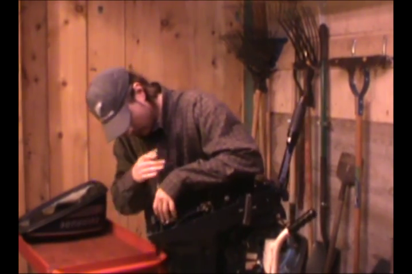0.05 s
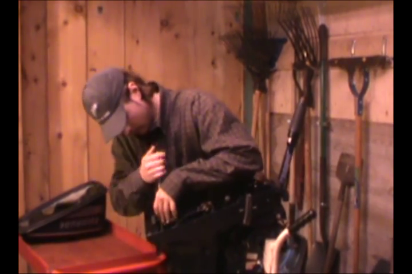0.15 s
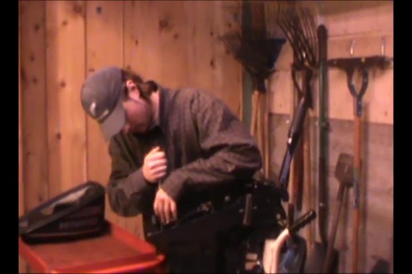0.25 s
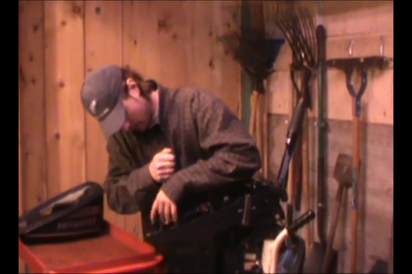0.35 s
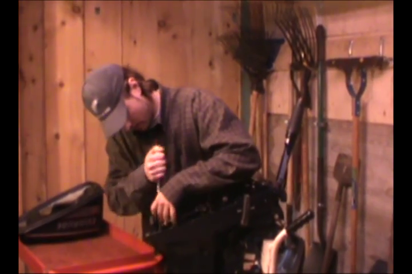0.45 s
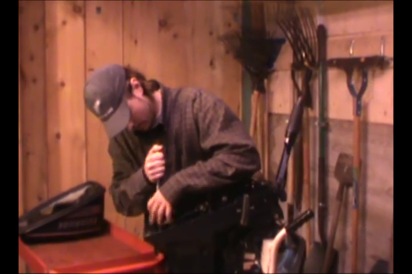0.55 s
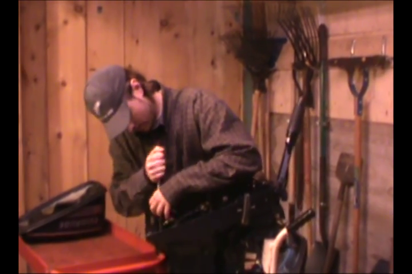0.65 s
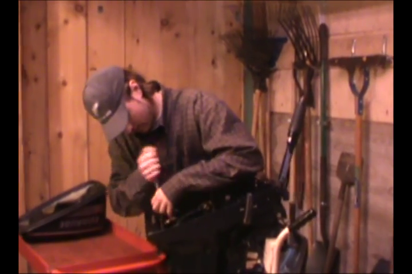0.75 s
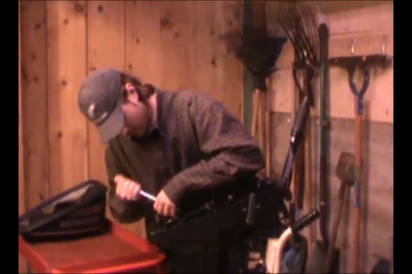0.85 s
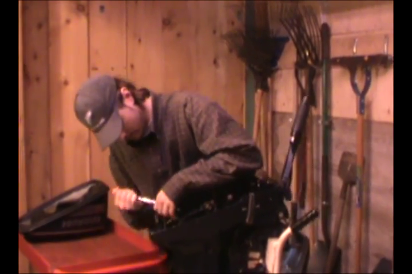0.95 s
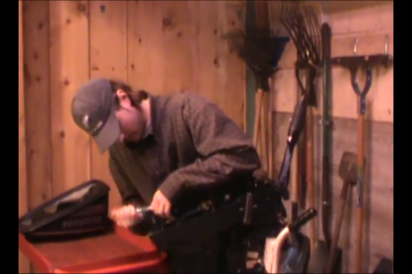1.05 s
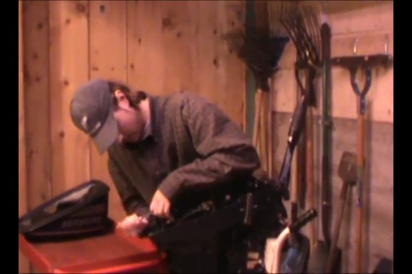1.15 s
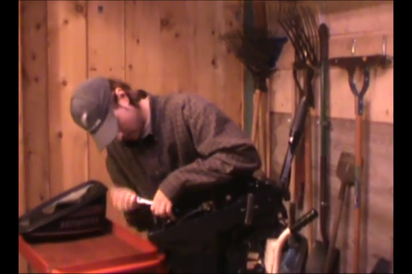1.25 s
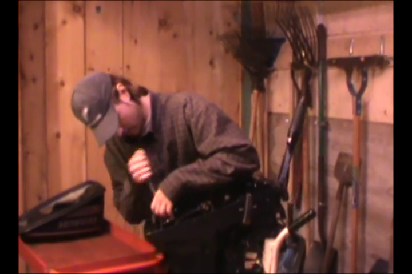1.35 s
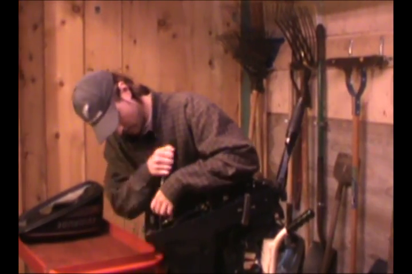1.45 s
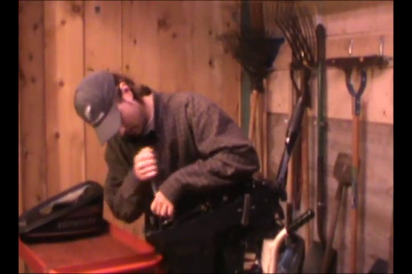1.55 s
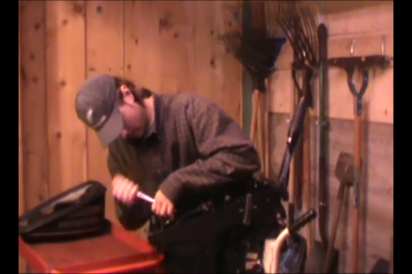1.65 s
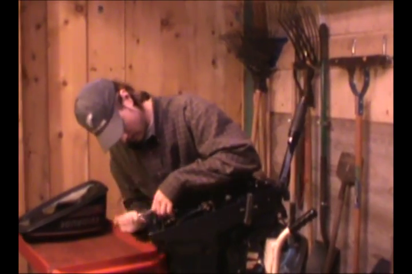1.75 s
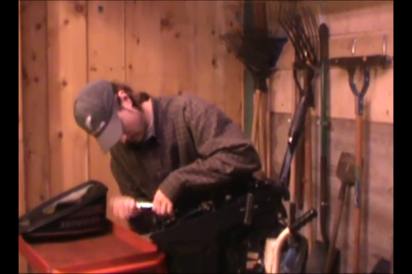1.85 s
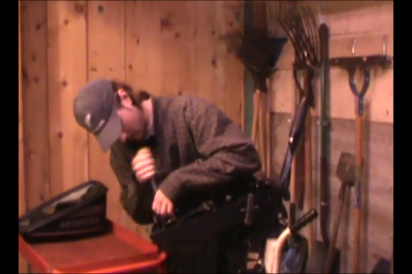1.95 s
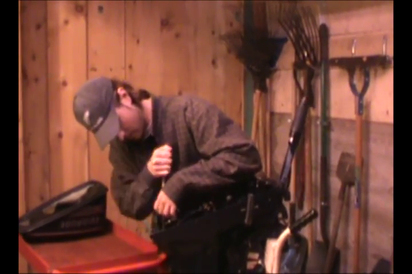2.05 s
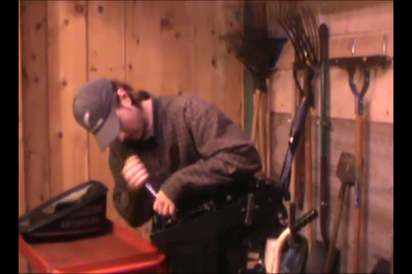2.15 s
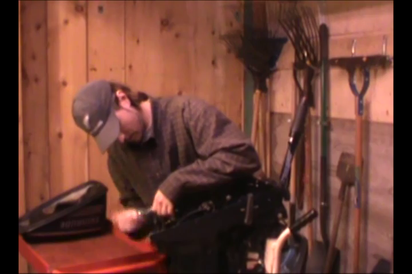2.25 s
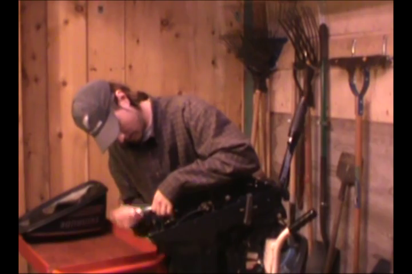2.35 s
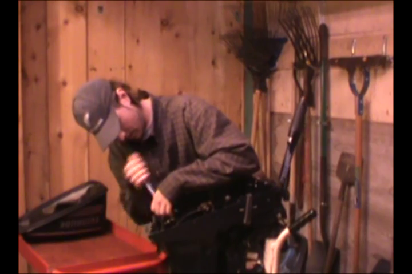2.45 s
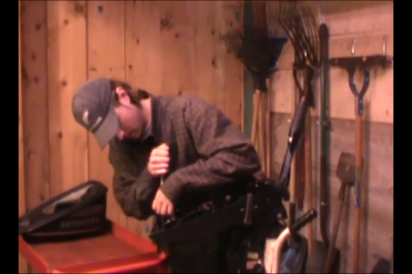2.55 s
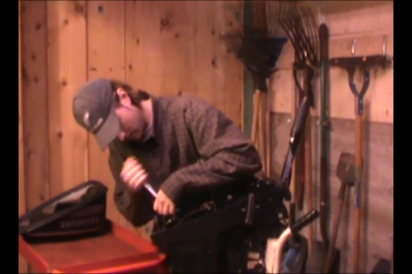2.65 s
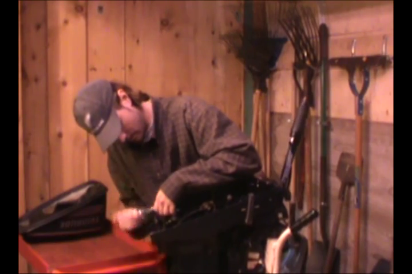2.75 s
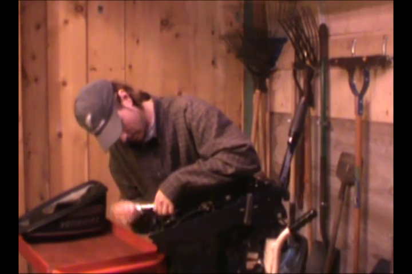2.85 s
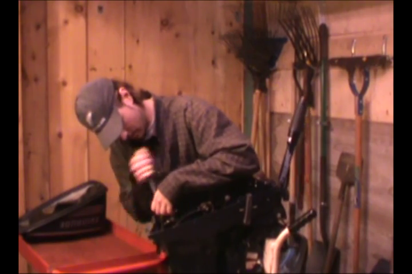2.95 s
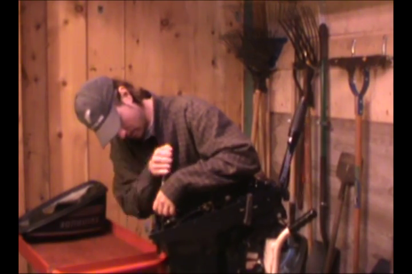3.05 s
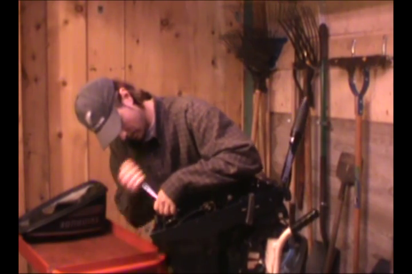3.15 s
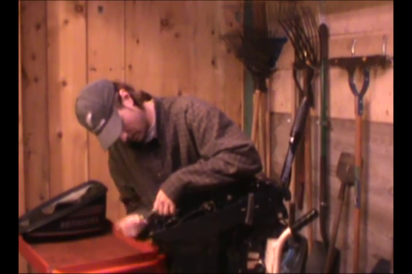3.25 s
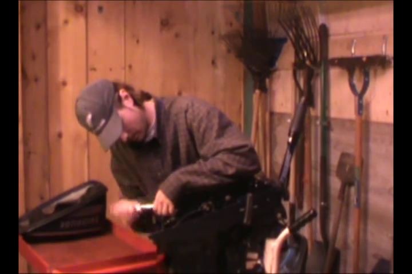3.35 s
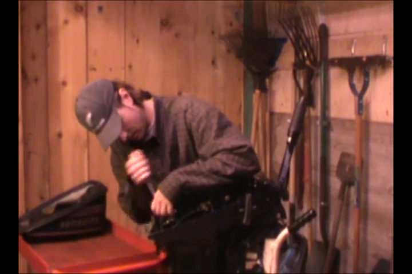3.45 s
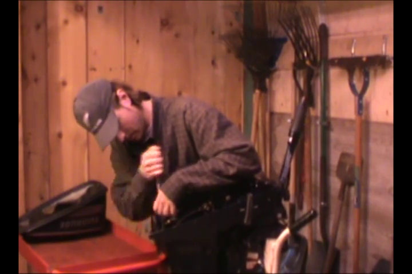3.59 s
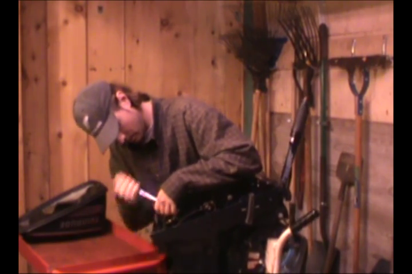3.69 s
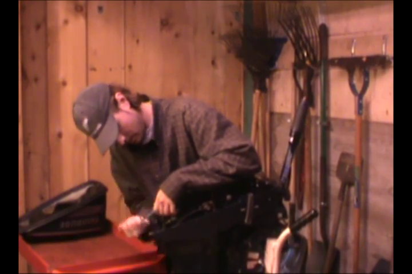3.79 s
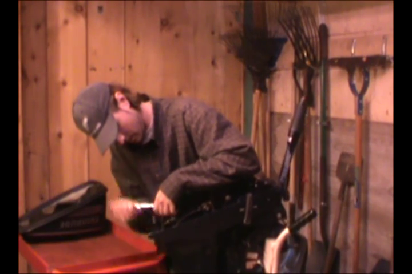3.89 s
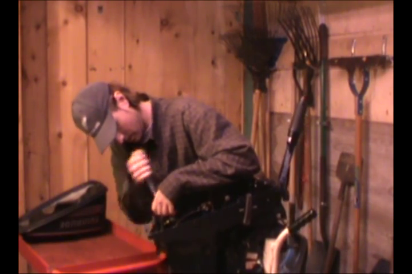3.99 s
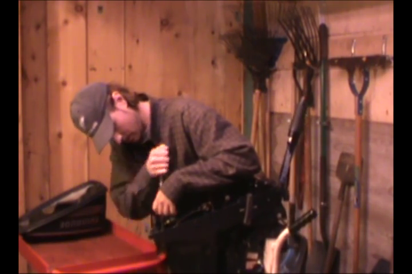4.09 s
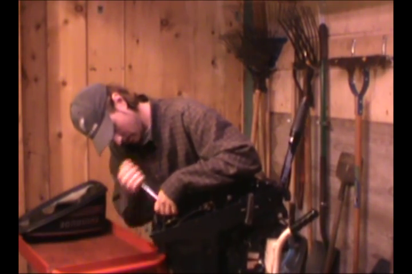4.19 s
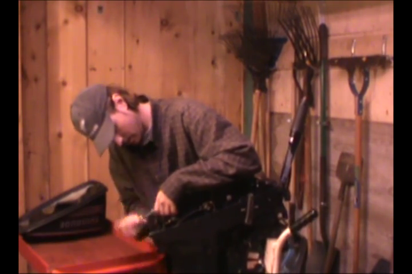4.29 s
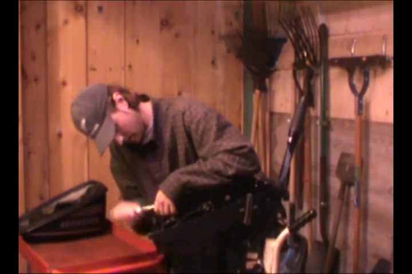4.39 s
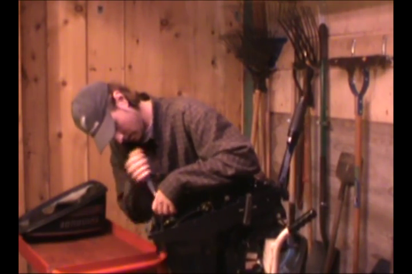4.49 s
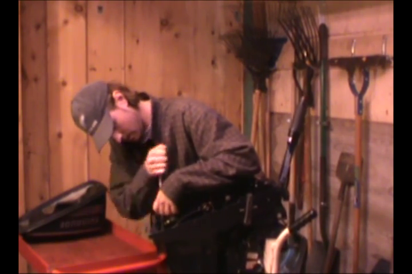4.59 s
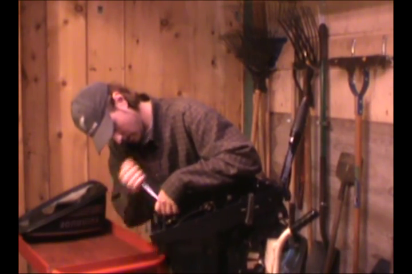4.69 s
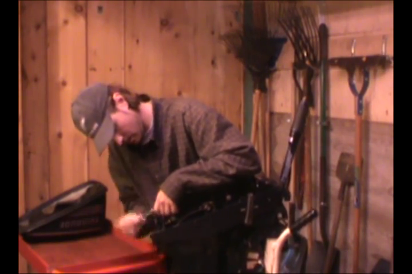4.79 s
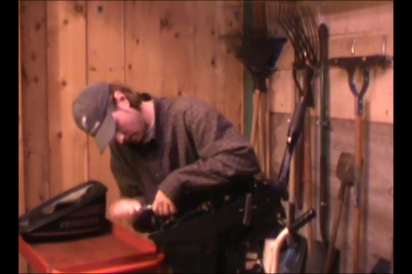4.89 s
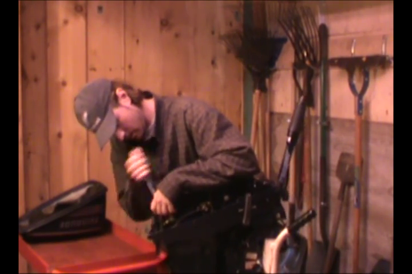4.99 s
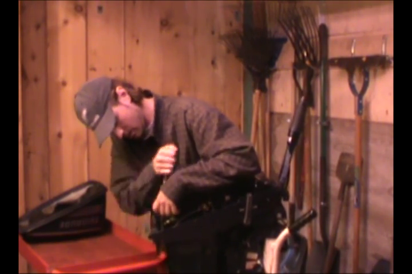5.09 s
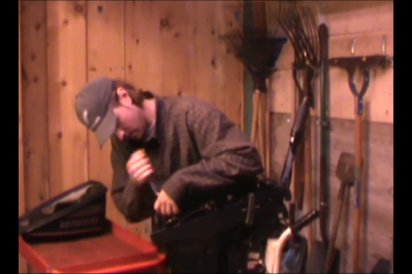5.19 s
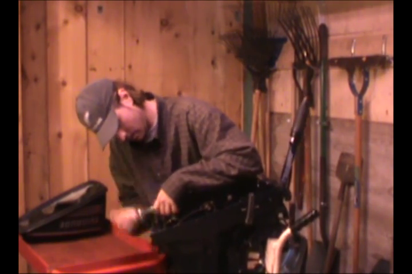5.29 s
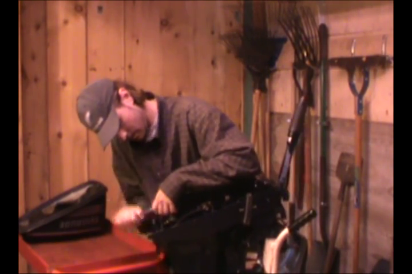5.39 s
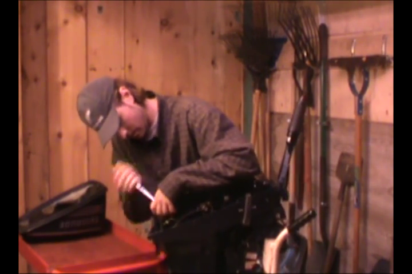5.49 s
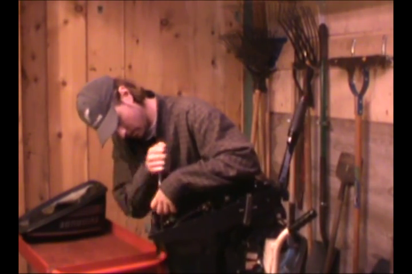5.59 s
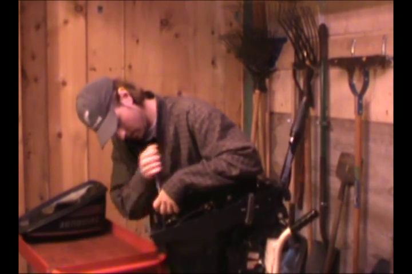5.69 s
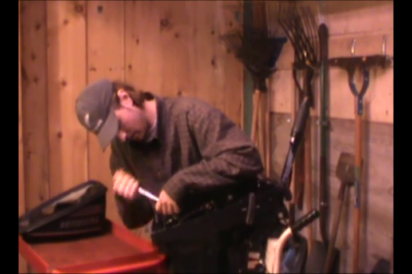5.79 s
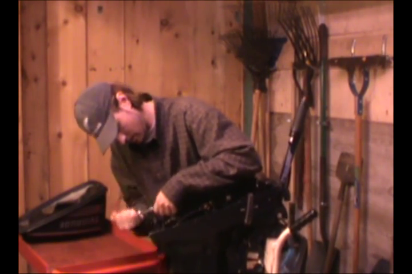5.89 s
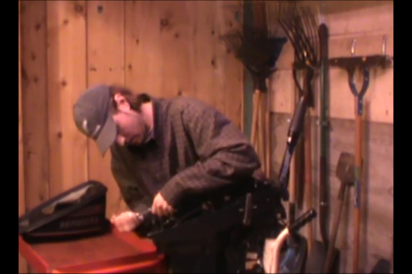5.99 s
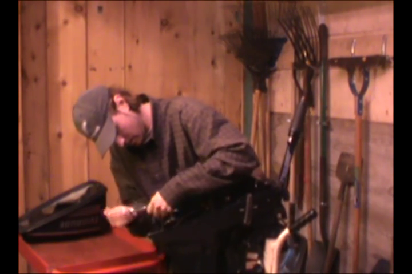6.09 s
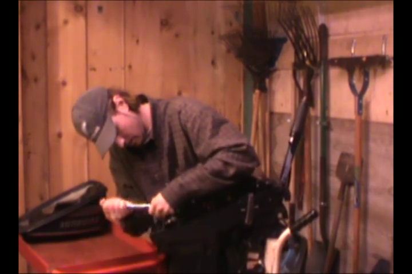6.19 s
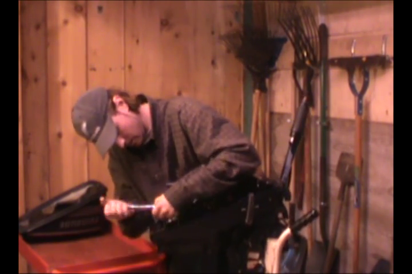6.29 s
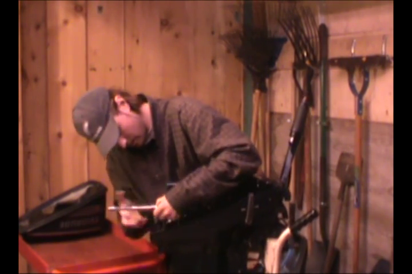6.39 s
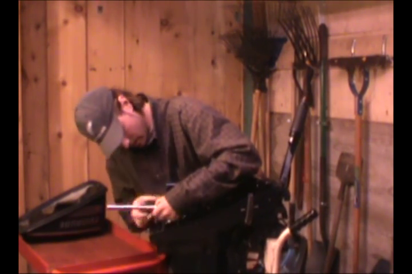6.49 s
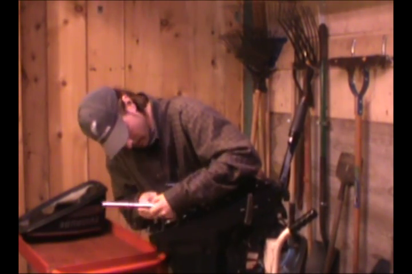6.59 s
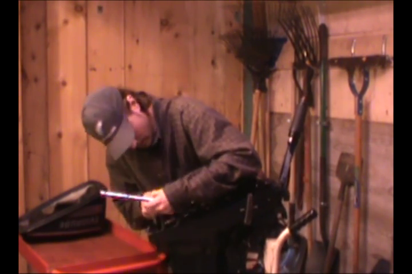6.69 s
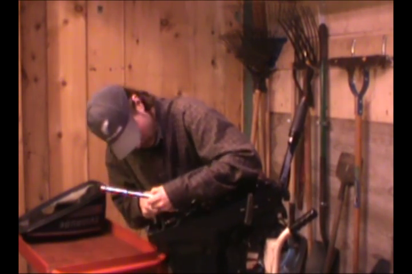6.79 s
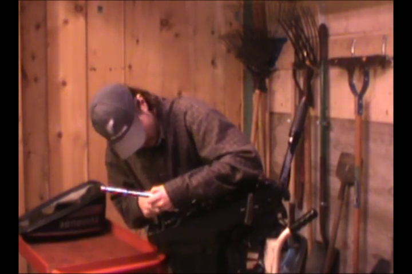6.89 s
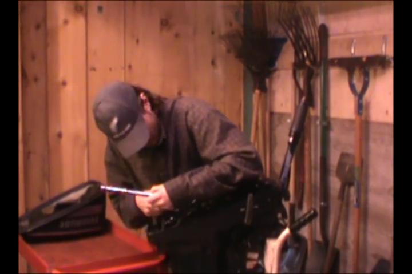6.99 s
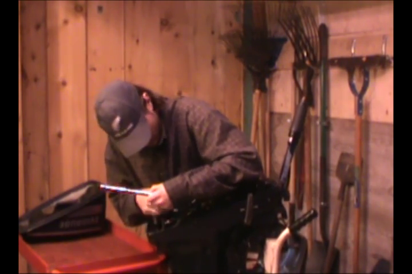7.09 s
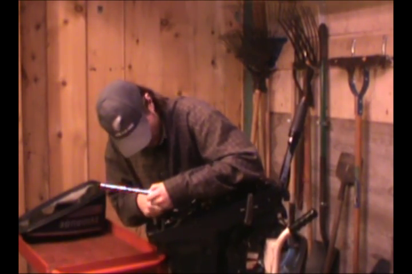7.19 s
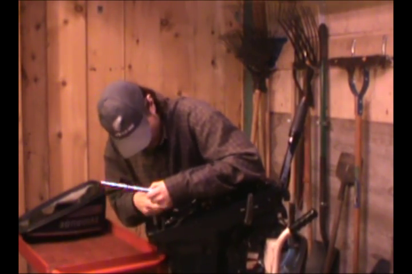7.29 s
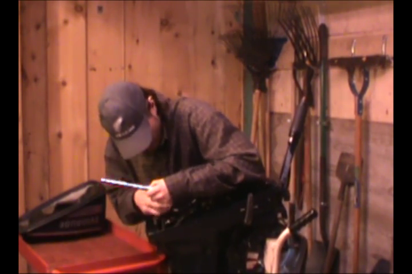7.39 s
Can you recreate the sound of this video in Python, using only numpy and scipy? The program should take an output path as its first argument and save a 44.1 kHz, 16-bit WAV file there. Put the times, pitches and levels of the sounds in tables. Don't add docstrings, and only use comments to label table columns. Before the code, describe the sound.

Short rapid bursts of crisp ratchet clicking repeat steadily, mixed with steel taps and hollow knocks, in a small echoing wooden shed.

```python
import sys
import numpy as np
from scipy import signal
from scipy.fft import rfft, irfft, next_fast_len
from scipy.io import wavfile

SR = 44100
rng = np.random.default_rng(int(sys.argv[2]) if len(sys.argv) > 2 else 0)


def bounce(signal):
    frames = np.transpose(np.atleast_2d(signal))
    limited = np.clip(frames, -1, 1)
    pcm = np.round(limited * 32767).astype(np.int16)
    wavfile.write(sys.argv[1], SR, pcm)


def gain_from_db(level_db):
    decades = np.asarray(level_db, float) / 20
    return 10 ** decades


N = 328103


def curve(points, hz):
    f, v = np.transpose(points)
    return np.interp(np.log(np.maximum(hz, 1)), np.log(f), v)


def colour(x, points):
    n = next_fast_len(x.shape[-1])
    gain = gain_from_db(curve(points, np.fft.rfftfreq(n, 1 / SR)))
    return irfft(rfft(x, n) * gain, n)[..., :x.shape[-1]]


def unit(x):
    return x / np.sqrt(np.mean(x ** 2))


def band(x, hz, width, order=3):
    edges = np.clip([hz * 2 ** (-width / 2), hz * 2 ** (width / 2)], 20, .45 * SR)
    return signal.sosfilt(signal.butter(order, edges, "band", fs=SR, output="sos"), x)


def ring(x, hz, t60):
    r, c = np.exp(-np.log(1000) / t60 / SR), np.cos(2 * np.pi * hz / SR)
    return signal.lfilter([1, -r * c], [1, -2 * r * c, r * r], x)


def burst(t60, size):
    return rng.standard_normal(size) * np.exp(-np.log(1000) * np.arange(size) / SR / max(t60, .001))


def add(out, s, x):
    i = int(s * SR)
    out[i:i + len(x)] += x[:len(out) - i]


def air(rumble_db):
    # f/Hz, level/dB per Hz
    hiss_colour = [(82, -13), (140, -6), (167, -10), (619, -8.5), (684, -30), (740, -7), (1100, -13),
                   (1450, -16.5), (16000, -22.5)]
    # f/Hz, side minus mid/dB
    hiss_width = [(60, -26), (110, -16.5), (200, -9), (380, -4), (700, -4.5), (1290, 1), (2380, 0),
                  (4400, -5.5), (8120, -11.5), (15000, -19)]
    # f/Hz, level/dB per Hz
    rumble_colour = [(12, -51), (20, -10), (27, -11.5), (43, -7), (65, 9.5), (81, 8), (102, -1), (160, -7),
                     (210, -23), (350, -120)]
    mid, side, low, side_low = rng.standard_normal((4, N))
    mid, side = colour(np.array([mid, colour(side, hiss_width)]), hiss_colour)
    hiss = gain_from_db(-56) * np.array([mid + side, mid - side]) / np.std(mid)
    rumble = colour(low + .055 * side_low * np.array([[1], [-1]]), rumble_colour)
    return hiss + gain_from_db(rumble_db) * unit(rumble)


def casing(push):
    # f/Hz, level/dB, t60/s
    cover_modes = [(338, 4, 0.033), (539.6, 7.5, 0.054), (658, 7, 0.04), (901, -36.5, 0.0057),
                   (1445, 2, 0.027), (1730, -8, 0.01)]
    return sum(gain_from_db(db) * ring(push, hz, t60) for hz, db, t60 in cover_modes)


def stir(cover_db, cloth_db):
    strength_db = rng.exponential(size=(2, N // 200 + 1)).repeat(200, axis=1)[:, :N]
    pushes, rustle = rng.standard_normal((2, N)) * gain_from_db(1.16 * strength_db)
    cover = unit(unit(casing(pushes)) + unit(band(pushes, 604, width=3.7)))
    return gain_from_db(cover_db) * cover + gain_from_db(cloth_db) * unit(band(rustle, 7160, width=0.79))


def knocks():
    # t/s, peak/dB, centre f/Hz
    bumps = [(0.196, -42, 663), (0.521, -36.5, 517), (0.817, -36, 450), (0.839, -42, 443), (1.58, -50, 558),
             (1.63, -46, 715), (1.729, -47.5, 527), (1.925, -47, 650), (2.176, -41, 1100),
             (2.36, -47.5, 620), (2.425, -40, 690), (2.645, -42.5, 650), (2.87, -46, 700),
             (3.165, -45.5, 640), (3.33, -40, 840), (4.216, -42, 620), (4.32, -41, 640),
             (4.845, -42.5, 800), (5.3, -43.5, 700), (6.245, -45.5, 695), (6.617, -46.5, 600),
             (7.06, -54, 630)]
    # t/s, peak/dB, centre f/Hz, t60/s
    clacks = [(0.521, -31.5, 2480, 0.044), (0.808, -43, 5000, .04), (0.817, -24.5, 2450, 0.03),
              (0.91, -39, 4500, 0.013), (3.689, -35, 2840, 0.095), (3.853, -32.5, 3300, 0.077),
              (6.218, -40, 4500, 0.054), (0.838, -27, 1520, 0.018), (0.924, -34.5, 2400, 0.096),
              (1.672, -40, 4500, 0.015), (2.359, -37.5, 1230, 0.15), (2.42, -29.5, 3020, 0.081),
              (2.645, -31, 4480, 0.12), (2.682, -36, 4000, 0.057), (2.9, -39.5, 1460, 0.077),
              (3.237, -33, 4900, 0.013), (3.27, -52, 2480, 0.052), (3.348, -32, 1470, 0.021),
              (4.378, -32, 2270, 0.021), (4.439, -39, 3500, 0.048), (4.7, -29, 3920, 0.024),
              (4.879, -28.5, 3180, 0.028), (4.944, -31.5, 3500, 0.0077), (5.244, -24.5, 3900, 0.018),
              (5.357, -32.5, 1690, 0.074), (5.41, -35.5, 1690, 0.035), (5.845, -43, 1940, 0.022),
              (6.161, -28, 5260, 0.11), (6.18, -41, 5500, 0.097), (6.199, -37, 5000, 0.087),
              (6.265, -46, 5170, 0.071), (6.241, -37, 4800, 0.053), (6.31, -36, 3500, 0.031),
              (6.327, -31, 4900, 0.031), (6.345, -47, 3500, .03), (6.362, -49, 3200, .03),
              (6.616, -36, 4270, 0.023), (6.618, -44.5, 1850, 0.034), (7.06, -56, 1510, 0.04),
              (6.17, -42.5, 1400, 0.15), (6.329, -40, 1490, 0.037)]
    # t/s, peak/dB, centre f/Hz, t60/s
    taps = [(0.02, -40, 8000, 0.011), (0.097, -54, 8000, .012), (0.112, -45, 4120, 0.027),
            (0.113, -44, 8500, 0.022), (0.3997, -15, 8080, 0.015), (0.4, -30.5, 3430, 0.017),
            (0.402, -38.5, 3860, 0.072), (0.401, -22.5, 9730, 0.049), (0.555, -39.5, 8300, 0.029),
            (0.834, -38, 7800, 0.027), (0.924, -40, 1930, 0.035), (0.923, -42, 3380, 0.021),
            (0.936, -38, 3120, 0.026), (0.817, -26.5, 7300, 0.015), (0.83, -34, 3780, 0.049),
            (6.242, -25.5, 5330, 0.013), (6.166, -37, 7000, 0.0064), (6.173, -33, 7500, .005),
            (6.244, -38, 8500, .012), (6.33, -51, 8450, .012), (3.345, -52, 1570, 0.052),
            (0.4, -29, 15600, 0.043), (0.896, -39, 8050, 0.022), (1.042, -42, 7450, 0.016),
            (3.833, -37, 7500, .015), (3.848, -33, 8000, 0.025), (1.893, -48, 4070, 0.066),
            (2.357, -44, 7460, .02), (2.918, -41, 4020, .03), (2.918, -40, 7200, 0.034),
            (3.212, -37.5, 4200, 0.034), (4.377, -34, 7850, 0.036), (5.357, -43, 6540, .04),
            (6.138, -35.5, 4030, 0.035), (6.139, -34, 8550, 0.02), (6.241, -32, 8500, 0.026),
            (6.328, -45, 8560, .035), (6.36, -40, 4000, .015)]
    bump_t60_s, bump_octaves, clack_octaves = 0.075, 1.84, 1.85
    tap_octave_s = 0.0079
    rows = [(*row, bump_t60_s, bump_octaves) for row in bumps]
    rows += [(*row, clack_octaves) for row in clacks]
    rows += [(*row, tap_octave_s / row[3]) for row in taps]
    rise = np.minimum(np.arange(5000) / SR / 0.00045, 1)
    out = np.zeros(N)
    for s, db, hz, t60, width in rows:
        knock = band(rise * burst(t60, size=5000), hz, np.clip(width, .03, 3.5), order=2)
        add(out, s, gain_from_db(db) * knock / np.abs(knock).max())
    return out + gain_from_db(-40.5) * casing(out)


def soft_tones(table, rise_s):
    out, t = np.zeros(N), np.arange(6000) / SR
    for s, db, hz, t60 in table:
        fade = gain_from_db(db - 60 * t / t60) * (1 - np.exp(-t / rise_s))
        add(out, s, fade * np.sin(2 * np.pi * hz * t))
    return out


def cover_rings():
    # t/s, level/dB, f/Hz, t60/s
    notes_of_cover = [(.524, -47, 694, 0.057), (1.3, -40.5, 673, 0.1), (1.562, -46, 550, 0.093),
                      (1.61, -49, 694, .07), (1.756, -49, 519, 0.17), (2.177, -45, 675, 0.052),
                      (2.426, -42.5, 702, 0.15), (2.481, -38, 667, 0.054), (2.646, -37, 530, 0.039),
                      (2.933, -43, 700, 0.054), (3.005, -47, 706, 0.074), (3.164, -47, 514, .06),
                      (3.29, -37.5, 670, 0.036), (3.33, -47, 530, 0.055), (3.423, -40, 673, 0.096),
                      (3.832, -44.5, 509, 0.067), (4.084, -42, 560, .05), (4.217, -41, 501, 0.12),
                      (4.464, -38, 651, .06), (4.586, -38, 665, 0.076), (4.849, -40.5, 705, 0.057),
                      (4.885, -43, 520, 0.057), (5.051, -51, 690, 0.052), (5.092, -41, 658, 0.076),
                      (5.248, -45, 506, 0.077), (5.362, -41, 630, 0.053), (5.51, -52, 682, 0.092),
                      (5.595, -45, 684, 0.063), (5.644, -43.5, 686, .08), (4.02, -43, 1480, .1),
                      (4.128, -42, 1460, .05), (4.545, -41, 1490, .05), (4.595, -43, 1400, .06),
                      (5.36, -40, 1515, .06), (7.058, -51, 640, .06), (6.163, -44, 10910, .18)]
    return soft_tones(notes_of_cover, rise_s=.003)


def frame_thumps():
    # t/s, level/dB, f/Hz, t60/s
    thuds = [(0.8181, -38.5, 256, 0.09), (0.8381, -43, 300, .05), (0.857, -46, 268, 0.044),
             (0.883, -52, 260, .05), (0.5271, -45, 297, 0.043), (.548, -51, 280, .04),
             (3.6841, -44, 333, 0.055)]
    return soft_tones(thuds, rise_s=0.00034)


def drops():
    # t/s, head level/dB, handle level/dB, socket level/dB
    swing_1 = [(1.2872, -39, -29, -29), (1.2939, -9, -21, -21), (1.3159, -7, -14, -20),
               (1.3333, -6, -14.5, -18), (1.3523, -4.5, -19, -19), (1.3687, -14, -24, -30),
               (1.3864, -7, -16.5, -18), (1.4045, -21, -18, -16), (1.4227, -22, -19, -18),
               (1.4432, -1.5, -18, -18), (1.4626, -13, -24, -31), (1.4851, -12.5, -16.5, -25),
               (1.5008, -33, -31, -33.5)]
    swing_2 = [(1.9257, 3, -24.5, -26), (1.942, -3, -21, -35), (1.957, -9, -25, -15),
               (1.9692, -9.5, -19, -24), (1.9825, -9, -23, -27.5), (1.9948, 0, -27, -42),
               (2.013, -17, -24, -25), (2.0356, -16, -22, -21), (2.0558, -13, -17, -29)]
    swing_3 = [(2.4428, -25, -16, -26), (2.4576, -21, -16, -27), (2.473, -24, -16, -22.5),
               (2.484, -19, -18, -30), (2.5003, -23, -12, -23), (2.5134, -15, -9, -36),
               (2.5343, -15, -12.5, -31), (2.5592, -20, -11.5, -35), (2.579, -20, -10, -30)]
    swing_4 = [(2.927, -36, -36, -42), (2.9335, -10.5, -17, -31.5), (2.9638, -12, -29, -29),
               (2.9784, 1, -35, -50), (2.9907, -19, -20, -31.5), (3.0008, -20, -22, -35),
               (3.0128, -14, -30, -34), (3.025, -9, -32, -27), (3.0353, -3.5, -37, -39),
               (3.0496, -13, -35, -39), (3.0652, -8.5, -28, -38.5), (3.1446, -16.5, -38, -48.5)]
    swing_5 = [(3.418, -28.5, -32, -44), (3.423, -1, -25, -20.5), (3.4427, -4, -19.5, -38),
               (3.4596, -8, -41, -31), (3.4835, -3, -13.5, -17.5), (3.4971, -0.5, -31, -19),
               (3.5093, -4, -11, -22), (3.5219, -22, -19, -14), (3.5349, -15.5, -10, -16),
               (3.5491, -14, -7, -13), (3.5735, -19, -9, -20.5)]
    swing_6 = [(3.9553, -9.5, -23.5, -19.5), (3.9736, -17, -13, -17.5), (4.003, -23, -6, -32),
               (4.02, -17, -11, -27), (4.0326, -12.5, -18.5, -18), (4.0454, -10, -18, -20),
               (4.0598, -1, -31.5, -13.5), (4.0734, -7, -12, -34), (4.093, -26, -27, -20),
               (4.1257, -13, -26, -23)]
    swing_7 = [(4.462, -38, -49, -38), (4.4645, -10.5, -29, -19.5), (4.4808, -12, -23, -28),
               (4.5226, -13, -25, -33), (4.5387, -21, -24, -24), (4.5488, -25, -14, -39),
               (4.561, -19, -19, -34), (4.5739, -12.5, -18, -29), (4.589, -32, -12, -29),
               (4.6074, -24, -18, -27)]
    swing_8 = [(4.966, -32, -44, -46), (4.9699, -11, -26.5, -25), (4.9855, -12.5, -16, -26),
               (5.0067, -4, -17, -39), (5.0208, -11, -22, -37), (5.032, -13, -21, -32),
               (5.0437, -14, -21, -32), (5.0566, -16, -21.5, -21.5), (5.0684, -20, -27, -26),
               (5.0798, -25, -29, -32), (5.091, -14, -24, -26), (5.1058, -22, -31, -24),
               (5.1218, -21, -26.5, -25)]
    swing_9 = [(5.4823, -2.5, -22.5, -27), (5.5005, -19, -20, -24), (5.5065, -7.5, -21, -22),
               (5.5236, -25, -35, -26), (5.567, -10, -14.5, -19), (5.585, -2.5, -14.5, -18),
               (5.5998, -3, -13, -18), (5.6147, -18, -16, -18.5), (5.6293, -2.5, -17.5, -17),
               (5.6552, -12, -15.5, -17.5), (5.6828, -34, -23, -30)]
    grips = [-19.5, -16, -12.5, -13.5, -18, -17.5, -11.5, -14, -15.5]
    # collar/dB, gear/dB, snap/dB, rattle/dB
    shaken_by_swing = [(-0.5, -9.5, -1, 2.5), (-3, 1, -0.5, 1.5), (4, -3, 0, 1.5), (4.5, 2.5, 4, 3),
                       (-3, -5.5, -1.5, 2.5), (0, -4, 0.5, 2.5), (5.5, 4.5, 2, 5.5), (7.5, -2.5, 4.5, 6),
                       (-1, -4.5, -3, 2.5)]
    # ring time/share of the free one, the same for the socket,
    # extension bar level/dB, head pitch shift at first drop/%, at last drop/%
    holds = [(1.8, 0.74, -8, -1.3, -0.3), (0.5, .7, -1, -0.56, 7), (0.7, 0.28, 1, 0.52, 3),
             (0.45, 0.21, 10, -0.31, 0.2), (0.68, 1, -8, -0.56, -0.5), (0.78, 0.39, 0.5, -0.084, 1.6),
             (0.64, 0.31, 4, 0.03, 2), (0.93, 0.51, -0.5, 0.66, 4.5), (0.8, 0.67, 1.5, -0.35, .6)]
    # t/s, level/dB
    nudges = [
        (4.324, -38.5),
        (4.845, -15.5),
    ]
    follow = 0.74
    scatter_db = 1.2
    swings = (swing_1, swing_2, swing_3, swing_4, swing_5, swing_6, swing_7, swing_8, swing_9)
    rows = []
    for swing, pawl_db, shaken, (*hold, first, last) in zip(swings, grips, shaken_by_swing, holds):
        s, head, handle, socket = np.transpose(swing)
        blow = np.maximum(head, handle)
        usual = np.median(blow)
        pawl = usual + follow * np.minimum(blow - usual, 0) + scatter_db * rng.standard_normal(len(s)) + pawl_db
        shift = first + (last - first) * (s - s[0]) / (s[-1] - s[0])
        for *parts, bend in zip(s, head, handle, socket, pawl, shift):
            rows.append((*parts, *shaken, *hold, bend))
    for s, db in nudges:
        rows.append((s, db - 40, db, db - 21, db - 36, 0, 0, 0, 0, .7, .7, 0, 0))
    return rows


def ratchet():
    # part (0 head, 1 handle, 2 socket, 3 pawl, 4 gear, 5 collar, 6 extension bar),
    # f/Hz, level/dB, t60/s
    steel = [(0, 9450, -1.5, 0.015), (0, 9720, -4.5, 0.018), (0, 9890, -3.5, 0.03),
             (0, 10260, -13.5, 0.025), (5, 11280, -1, 0.029), (1, 6993, -1.5, 0.041), (1, 7024, -3, 0.061),
             (1, 6460, -3.5, 0.015), (1, 7325, 7.5, 0.01), (1, 5500, -14, 0.017), (2, 3873, -3.5, 0.045),
             (6, 4020, -4, 0.034), (6, 4276, -6, 0.026), (6, 3645, -10.5, 0.025), (6, 4540, -11, 0.021),
             (3, 14860, 1, 0.025), (3, 15200, -8, 0.012), (3, 15420, 11, 0.015), (4, 8320, 11.5, 0.01),
             (4, 8524, 14.5, 0.01), (4, 9510, 7.5, 0.011)]
    wander = [
        0.0052,
        0.0046,
        0.0055,
        0.014,
        0.029,
        0.0051,
        0.023,
    ]
    # f/Hz, level/dB
    snap_colour = [(300, -61), (1000, -31.5), (2500, -30), (5300, -22.5), (7000, -9), (10500, -15),
                   (11800, -21.5), (12500, -37), (14500, -24.5)]
    # f/Hz, level/dB
    rattle_colour = [(300, -24), (900, -7), (3000, -0.5), (5500, -1), (11000, -21), (12500, -22),
                     (13700, -8), (15500, -19)]
    lead_s = .0004
    stagger_s = .0006
    rebound_s, rebound_db = .0035, -4.5
    out, snaps, shake, t = np.zeros(N), np.zeros(N), np.zeros(N), np.arange(2000) / SR
    part, hz, mode_db, t60 = np.transpose(steel)[:, :, None]
    part = np.rint(part).astype(int)
    contact = 1 - np.exp(-(t[:900] / 0.00077) ** 2)
    shake_rise = np.minimum(t / 0.003, 1)
    for s, *part_db, collar_db, gear_db, snap_db, rattle_db, hold, socket_hold, bar_db, shift in drops():
        hold = np.clip(np.where(part == 2, socket_hold, hold), .2, 2)
        blow_db = np.mean(part_db)
        part_db = np.append(part_db, [blow_db + gear_db, blow_db + collar_db, part_db[2] + bar_db])
        phase, size, grip, lag = rng.standard_normal((4, len(steel), 1))
        late = np.maximum(t - stagger_s * np.abs(lag), 0)
        strike_db = part_db[part] + mode_db - 4.0 + 1.4 * size
        fade = gain_from_db(strike_db - 60 * late / (t60 * hold)) / np.sqrt(hold)
        rise = 1 - np.exp(-(late / 0.00091) ** 2)
        pitch = hz * (1 + np.array(wander)[part] * grip + (part == 0) * shift / 100)
        modes = rise * fade * np.sin(2 * np.pi * (pitch * t + phase))
        add(out, s - lead_s, np.sum(modes, axis=0))
        snap_gain = gain_from_db(blow_db + snap_db + 22.5)
        add(snaps, s - lead_s, snap_gain * contact * burst(0.013, size=900))
        second = s + rebound_s * rng.uniform(.5, 1.5)
        add(snaps, second, snap_gain * gain_from_db(rebound_db) * contact * burst(0.017, size=900))
        add(shake, s, gain_from_db(.5 * blow_db + rattle_db - 19) * shake_rise * burst(0.059, size=2000))
    hum = gain_from_db(-73) * casing(snaps)
    return out + colour(snaps, snap_colour) + colour(shake, rattle_colour) + hum


def slips():
    # t/s, level/dB, f/Hz, t60/s, low body level/dB
    thread = [(3.667, -35, 4600, .008, -16), (3.672, -24, 3980, .008, -20), (3.678, -31, 4600, .008, -10),
              (3.684, -16.5, 4020, 0.0047, -3.5), (3.692, -28, 4800, 0.0056, -1),
              (3.7515, -21, 4400, 0.0073, -28), (3.759, -28, 4600, .008, -14),
              (3.793, -22.5, 3780, 0.0053, -22), (3.7988, -31, 4300, .012, -24),
              (3.8062, -23, 4300, 0.0086, -3), (3.815, -24, 3880, .011, -9),
              (3.8302, -23, 3850, 0.0082, -2), (3.8358, -28, 4160, 0.0049, 5),
              (3.8433, -28, 4500, 0.0047, 9.5), (3.849, -20.5, 3750, 0.018, 2.5),
              (3.8505, -35, 4330, 0.0076, 5.5)]
    out = np.zeros(N)
    for s, db, hz, t60, body_db in thread:
        grit = burst(t60, size=900)
        tick = band(grit, hz, 0.42, order=2)
        body = band(grit, 1900, 1.85, order=2)
        add(out, s, gain_from_db(db + 1) * (tick / np.abs(tick).max() + gain_from_db(body_db) * body / np.abs(body).max()))
    return out


def reply():
    # t/s, level/dB, left minus right/dB
    planks = [
        (.0043, -6.5, 3),
        (.0068, -14.5, -4.5),
        (.0098, -16.5, -5.5),
        (0.013, -12.5, 3),
    ]
    # f/Hz, t60/s
    decay = [(250, 0.41), (1000, 0.38), (4000, 0.36), (8000, 0.24), (14000, 0.18)]
    # f/Hz, side minus mid/dB
    wash_width = [(250, -22.5), (1000, -12), (2000, -26), (4000, -12), (8000, -15.5), (14000, -1.5)]
    t, wash = np.arange(int(.45 * SR)) / SR, 0
    for hz in 125 * 2 ** np.arange(0, 7.1):
        fade = np.exp(-np.log(1000) * t / curve(decay, hz)) * np.minimum(t / 0.016, 1)
        mid_side = np.array([[1], [gain_from_db(curve(wash_width, hz))]])
        wash = wash + fade * band(rng.standard_normal((2, len(t))), hz, 1) * mid_side
    mid, side = gain_from_db(-3) * wash / np.sqrt(np.sum(wash[0] ** 2))
    out = np.array([mid + side, mid - side])
    for s, db, pan_db in planks:
        out[:, int(s * SR * rng.uniform(.96, 1.04))] += gain_from_db(db + np.array([pan_db, -pan_db]) / 2)
    return out


def shed(x, count):
    place = np.arange(N) / SR / .045 % count
    n, echo = next_fast_len(N + SR), 0
    for k in range(count):
        away = np.abs((place - k + count / 2) % count - count / 2)
        heard = x * np.cos(np.pi / 2 * np.minimum(away, 1))
        echo = echo + rfft(heard, n) * rfft(reply(), n)
    return x + irfft(echo, n)[:, :N]


def scene():
    # t/s, level/dB
    effort_points = [(0.0, 0), (1.3, -5.5), (1.64, -3.5), (2.2, -1.5), (3.2, 5.5), (3.9, 6), (4.2, 1),
                     (4.55, 5), (5.3, 4), (6.3, -2), (6.8, -12), (7.44, -31)]
    effort = np.interp(np.arange(N) / SR, *np.transpose(effort_points))
    ticks, hollow = slips(), cover_rings()
    hands = stir(cover_db=-61.5 + effort, cloth_db=-65 + effort)
    tool = gain_from_db(-2.0) * (ratchet() + knocks())
    echoed = tool + gain_from_db(-13) * ticks + gain_from_db(-2) * hollow + frame_thumps() + hands
    direct = gain_from_db(-8.5) * ticks + gain_from_db(-2.5) * hollow
    return shed(echoed, count=4) + direct + air(rumble_db=-62.5 + 0.17 * effort)


def band_limit(x):
    return signal.sosfilt(signal.butter(12, 16980, fs=SR, output="sos"), x)


def record(dry):
    cut = signal.sosfilt(signal.ellip(8, .2, 30, 15720, fs=SR, output="sos"), dry)
    return band_limit(cut)


dry = scene()
out = record(dry)
bounce(out)
```